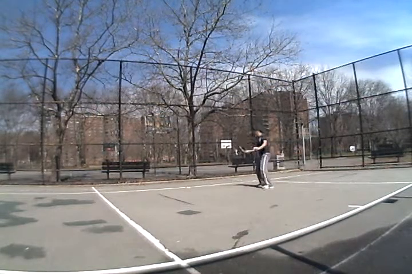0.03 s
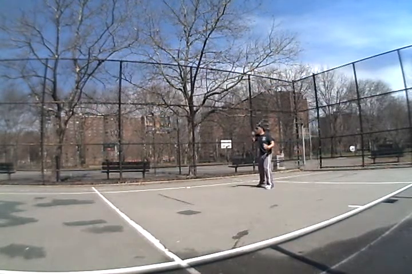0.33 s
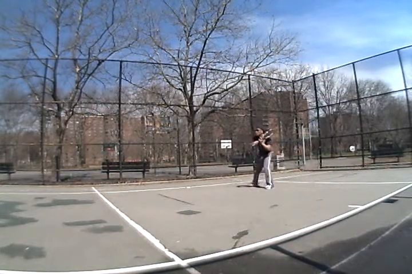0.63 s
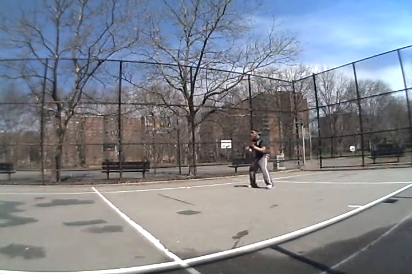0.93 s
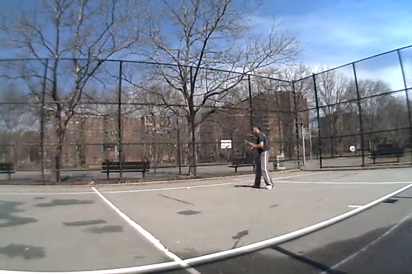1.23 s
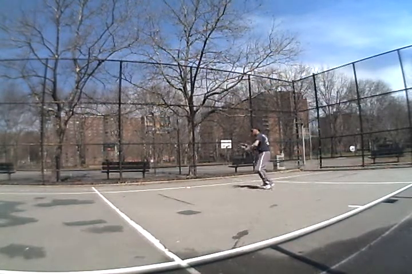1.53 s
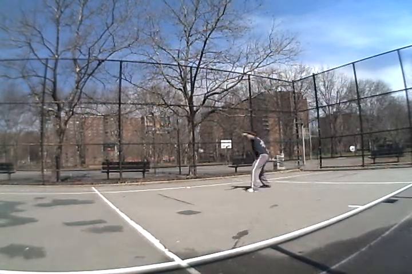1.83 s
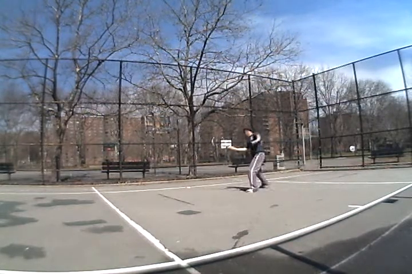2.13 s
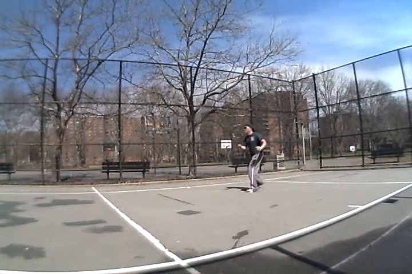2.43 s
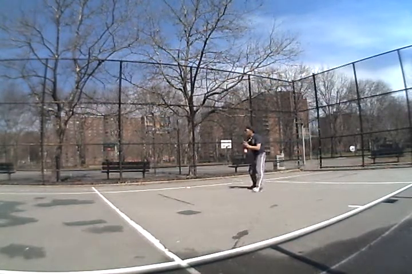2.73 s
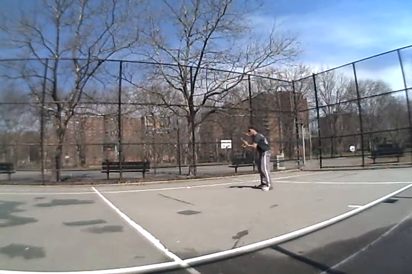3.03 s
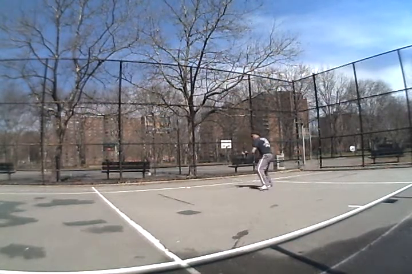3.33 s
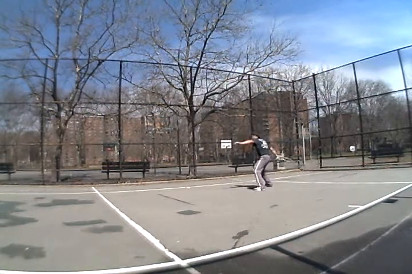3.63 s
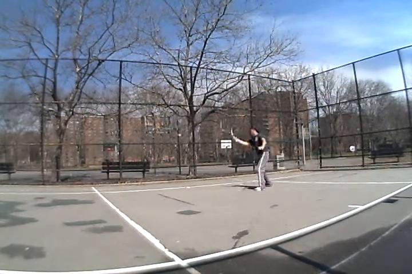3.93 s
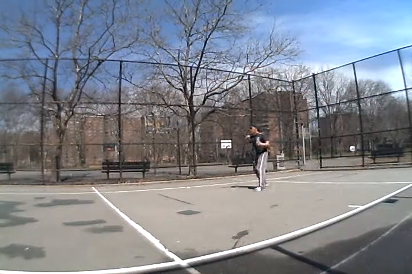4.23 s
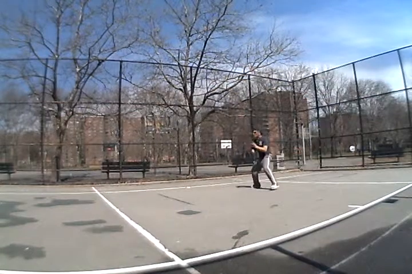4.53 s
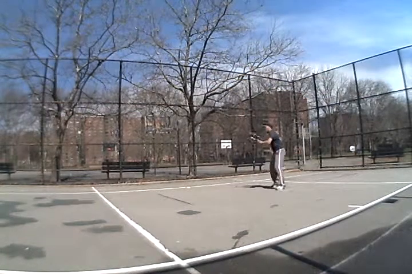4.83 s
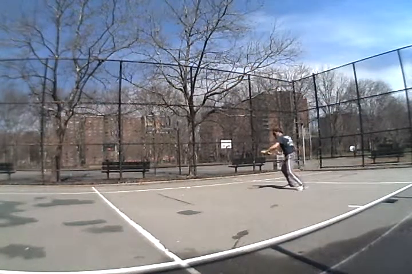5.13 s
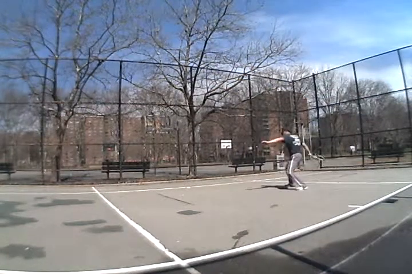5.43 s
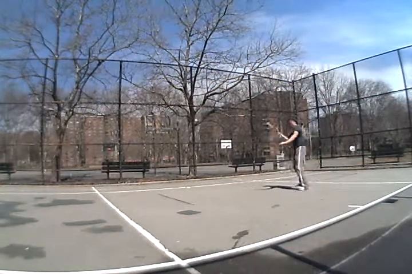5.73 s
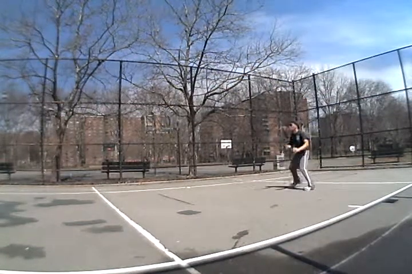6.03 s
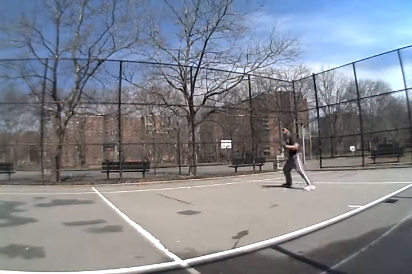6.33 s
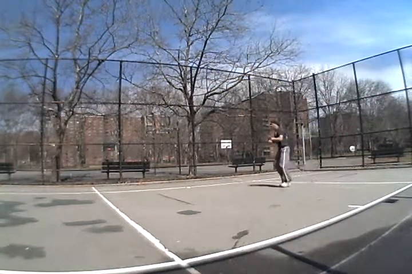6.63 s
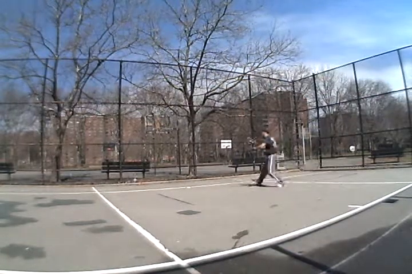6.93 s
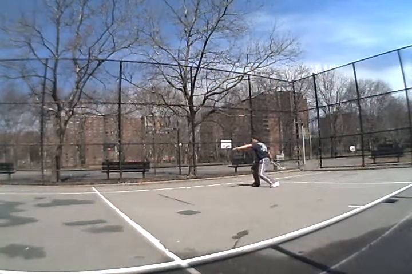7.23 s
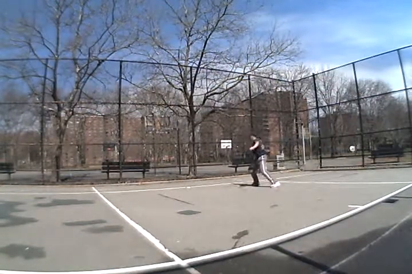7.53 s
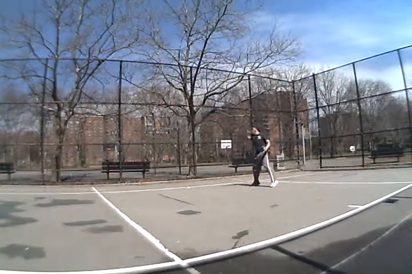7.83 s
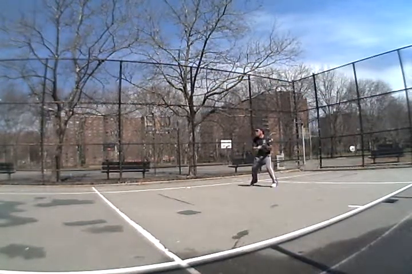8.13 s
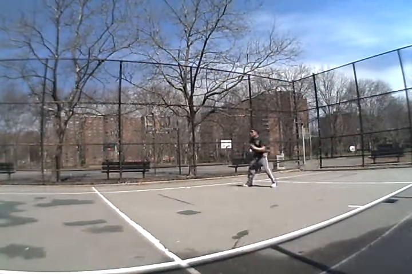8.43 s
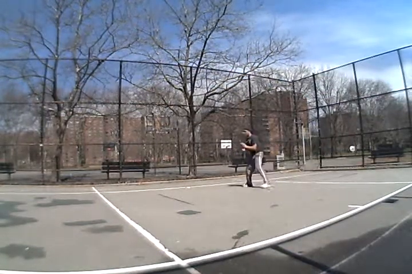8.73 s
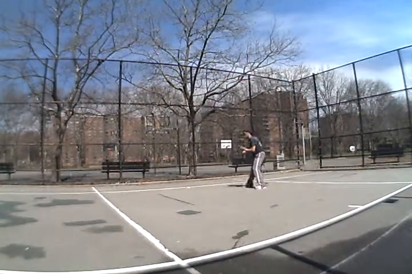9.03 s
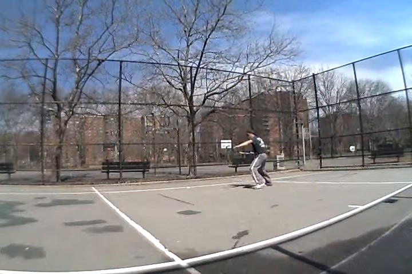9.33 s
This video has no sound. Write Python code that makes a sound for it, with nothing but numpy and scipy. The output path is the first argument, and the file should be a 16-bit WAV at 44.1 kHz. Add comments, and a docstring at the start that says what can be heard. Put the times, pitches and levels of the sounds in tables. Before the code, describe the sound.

Outdoors, over a low breeze and a faint hum of far traffic, a tennis ball goes around in an even cycle: a hollow racket hit, a crisp pop on a wall close to the microphone, then a light bounce on the court. The cycle comes about every two seconds, with quiet gritty shoe scrapes in between. Midway the wind picks up, battering the microphone with loud, fluttering low thumps.

```python
"""Tennis against a practice wall

A player rallies on an outdoor court, heard from near the wall. Each round is a woody racket stroke,
a pop on the wall as the ball's shell buckles, and a softer bounce, with shoes scuffing on grit between.
Gusts buffet the microphone, at times into overload, over the hum of distant traffic."""
import sys
import numpy as np
from scipy import signal
from scipy.fft import rfft, irfft, next_fast_len
from scipy.io import wavfile
from scipy.ndimage import uniform_filter1d, map_coordinates

SR = 44100
rng = np.random.default_rng(int(sys.argv[2]) if len(sys.argv) > 2 else 0)


def to_wav(s):
    """Save 16-bit WAV."""
    ch = np.atleast_2d(s).T  # columns
    pcm = np.round(np.clip(ch, -1, 1) * 32767)  # PCM
    wavfile.write(sys.argv[1], SR, pcm.astype(np.int16))


N = 414099
TIME = np.arange(N) / SR
HIT_TIME = TIME[:SR // 8]
# colour of the court's reverb on strokes and bounces: (frequency [Hz], relative level [dB])
COURT_TAIL = [(100, -3), (300, 4.5), (700, 1), (1400, -2), (2800, -9.5), (4500, -13), (8500, -18.5),
              (12000, -50.5)]


def undb(db):
    """Decibels to gain."""
    return np.exp(np.asarray(db) * np.log(10) / 20)


def unit(x):
    """Scale to rms 1."""
    return x / np.sqrt(np.mean(x ** 2))


def curve(points):
    """An envelope of straight lines through (time [s], value) points."""
    return np.interp(TIME, *np.transpose(points))


def colour(x, points):
    """Equalise by (frequency [Hz], gain [dB]) points."""
    hz, db = np.transpose(points)
    size = next_fast_len(len(x), real=True)
    bins_hz = np.maximum(np.arange(size // 2 + 1) * SR / size, 1)
    gain = undb(np.interp(np.log(bins_hz), np.log(hz), db))
    return irfft(rfft(x, size) * gain, size)[:len(x)]


def noise(points, size=N):
    """Coloured noise of rms 1."""
    return unit(colour(rng.standard_normal(size), points))


def patter(points, per_s, size=N):
    """Random pulses of uneven strength, coloured, rms 1."""
    return unit(colour(rng.standard_normal(size) * (rng.random(size) < per_s / SR), points))


def band(x, hz, q):
    """One resonance."""
    return signal.lfilter(*signal.iirpeak(min(hz, SR / 3), max(q, hz / SR * 3), fs=SR), x)


def band_noise(hz, q, passes=1, size=len(HIT_TIME)):
    """Noise through a resonance; more passes steepen its skirts."""
    x = rng.standard_normal(size)
    for _ in range(passes):
        x = band(x, hz, q)
    return x


def cut(x, hz, kind):
    """Gentle low-pass or high-pass."""
    return signal.lfilter(*signal.butter(1, hz, kind, fs=SR), x)


def walk(per_s):
    """Smooth random wander of rms 1."""
    hold = max(int(SR / per_s), 1)
    steps = np.repeat(rng.standard_normal(N // hold + 1), hold)
    return unit(uniform_filter1d(steps, hold)[:N])


def add(out, s, x):
    """Mix x into out at time s."""
    i = max(int(s * SR), 0)
    out[i:i + len(x)] += x[:max(N - i, 0)]


def kick(at_ms, decay_ms):
    """A sudden pressure step that dies away."""
    ms = HIT_TIME * 1000 - at_ms
    return (ms >= 0) * np.exp(-np.abs(ms) / decay_ms)


def push(at_ms, width_ms):
    """A soft, rounded pressure pulse."""
    return np.exp(-((HIT_TIME * 1000 - at_ms) / width_ms) ** 2)


def ring(modes, at_ms, scatter):
    """Decaying modes, slightly detuned at each blow."""
    t = np.maximum(HIT_TIME - at_ms / 1000, 0)
    out = np.zeros(len(t))
    for hz, db, t60 in modes:
        detuned_hz = hz * (1 + scatter * rng.standard_normal())
        out += undb(db - 60 * t / t60) * np.sin(2 * np.pi * detuned_hz * t)
    return out


def court(x, spectrum, gap_s, early_db, early_t60, late_db, late_t60):
    """After a gap, fence and trees scatter a blow into a wash; house fronts add a faint long one."""
    t = TIME[:SR]
    fade = undb(early_db - 60 * t / early_t60) + undb(late_db - 60 * t / late_t60)
    tail = noise(spectrum, size=SR) * fade * np.clip((t - gap_s) / 0.01, 0, 1)
    return np.pad(x, (0, SR - len(x))) + np.sqrt(np.sum(x ** 2) / SR) * tail


def whine():
    """A faint, narrow high hiss."""
    return undb(-80) * unit(band_noise(hz=7980, q=30, passes=2, size=N))


def thin_tone():
    """A faint thin tone swells and fades far away."""
    swell = np.interp(TIME, [2.25, 2.35, 2.55, 2.65], [0, 1, 1, 0])
    hz = 3380 * (1 + 0.0048 * walk(60))
    return undb(-74.5) * swell * np.sin(2 * np.pi * np.cumsum(hz) / SR)


def traffic():
    """A distant, gently wavering road hum."""
    # rise and fall of the hum: (time [s], relative level [dB])
    ride = [(0, -60.5), (2.9, -59.5), (3.9, -60.5), (5.1, -59), (7.2, -59.5), (7.85, -61.5), (9.39, -62.5)]
    # colour of the road: (frequency [Hz], relative level [dB])
    spectrum = [(40, -1), (120, -4), (250, -6), (500, -10), (800, -13), (1300, -20.5), (2000, -25.5),
                (3300, -33), (4500, -36), (7000, -40.5), (8600, -42.5)]
    return undb(curve(ride) + 11 + .5 * walk(4.2)) * noise(spectrum)


def gusts():
    """The wind's gust envelope: each rises quickly, holds and dies away."""
    # gusts at the microphone: (time [s], hold [s], strength [dB])
    cues = [(0.808, 0.08, -41), (2.7, 0.23, -41.5), (3.297, 0.058, -34.5), (4.132, 0.13, -27.5),
            (4.331, 0.041, -25), (4.494, .23, -23.5), (5.25, 0.47, -24.5), (5.975, 0.043, -27.5),
            (6.344, 0.047, -25), (6.542, 0.15, -26), (6.942, 0.37, -28.5), (7.348, 0.2, -24.5),
            (7.622, 0.51, -39), (8.489, 0.48, -32.5), (9.072, 0.27, -31)]
    attack_s, release_s = 0.052, 0.075
    return sum(undb(db) * np.interp(TIME, [s - attack_s, s, s + hold, s + hold + release_s], [0, 1, 1, 0])
               for s, hold, db in cues)


def buffets():
    """Big eddies peak and collapse, fluttering; returns their pressure and how far they duck the swell."""
    # the hardest buffets: (time [s], peak pressure [full scale], build-up [ms], collapse [ms],
    # relative flutter level [dB], flutter pitch [Hz])
    cues = [(4.356, 0.32, 2.5, 1.8, -35, 453), (4.367, -0.15, 0.94, 1.4, -25.5, 504),
            (4.575, -0.64, 2.4, 2.6, -22.5, 387), (4.672, 0.45, 1.6, 1.2, -13.5, 381),
            (5.6615, -0.99, 4.6, 3.7, -30, 385), (6.358, -0.35, 5.3, 1.3, -14.5, 274),
            (6.626, -0.65, 2.6, 21, -24, 314), (6.647, 0.41, 1.5, 1.5, -20.5, 280),
            (6.689, 0.027, 1.2, 1.1, -23.5, 357), (6.963, -.82, 3.8, 3.6, -31, 396),
            (6.996, 0.2, 1.4, 1, -18, 295), (7.048, 1.1, 3.7, 1.63, -20.5, 439),
            (7.059, -.65, 5, 4, -39, 300), (7.2271, -0.88, 5.4, 2.3, -34, 305),
            (7.355, 0.11, 1.7, 1.5, -28, 446), (7.379, 0.78, 4.6, 1.9, -27, 406),
            (7.499, 1.3, 8, 1.7, -22, 330), (7.53, 0.41, 5, 1.8, -25.5, 536),
            (7.5648, -.95, 6.4, 5, -29, 350), (8.533, 0.19, 1.5, 1.5, -26, 317),
            (8.601, 0.3, 2.7, 1.8, -29, 280), (8.633, 0.31, 4.5, 4.4, -33, 354),
            (8.662, 0.25, 1.6, 1.6, -21.5, 300), (8.69, -0.17, 1.3, 1.9, -24.5, 320),
            (8.793, 0.47, 1.6, 1.4, -29, 320), (9.03, -0.38, 2.5, 2.4, -17.5, 294),
            (9.322, 0.27, 2.1, 1.8, -26, 297)]
    passage_s, core_s = 0.041, 0.021
    out, duck = np.zeros((2, N))
    t = HIT_TIME - HIT_TIME.mean()
    passage, core = (np.cos(np.pi * np.clip(t / span, -.5, .5)) ** 2 for span in (passage_s, core_s))
    for s, pressure, build_ms, collapse_ms, flutter_db, hz in cues:
        peak = 1 / (1 + (1000 * t / np.where(t < 0, build_ms, collapse_ms)) ** 2)
        flutter = unit(band_noise(hz, q=2.3, passes=3))
        add(out, s + t[0], pressure * passage * peak + 0.36 * undb(flutter_db) * core * flutter)
        add(duck, s + t[0], passage)
    return out, np.minimum(duck, 1)


def wind():
    """Slow pressure swells on the microphone; gusts shed eddies, and the strongest break into flutter."""
    # slow pressure of the breeze: (time [s], relative level [dB])
    breeze_ride = [(0.0, -45), (0.05, -30.5), (1.12, -28), (2.59, -36), (4.0, -27), (4.65, -21.5),
                   (5.02, -26), (5.28, -28.5), (5.52, -33.5), (5.75, -12.5), (5.79, -29), (7.22, -16.5),
                   (8.47, -29.5), (8.5, -21), (9.13, -23), (9.39, -28.5)]
    # sub-bass swell, rumbling eddies, flapping vortices: (frequency [Hz], relative level [dB])
    swell_spectrum = [(4, -1), (10, 4), (20, 3.5), (32, -4.5), (50, -5.5), (85, -13.5), (130, -30),
                      (250, -45), (600, -87), (1500, -120)]
    eddy_spectrum = [(50, -9), (100, 1.5), (160, -3), (240, -11), (330, -19), (480, -28), (800, -54.5),
                     (1500, -61), (4000, -100)]
    flutter_spectrum = [(120, -23), (260, 7), (350, 5), (500, -11.5), (750, -23), (1200, -39),
                        (2500, -56.5), (6000, -92)]
    calm_db, break_db, break_width_db = -44.5, -32, 4.5
    breeze, gust = undb(curve(breeze_ride)), gusts()
    pressure = np.hypot(undb(4) * breeze, undb(6) * gust)
    flow_db = 10 * np.log10(gust ** 2 + undb(calm_db) ** 2 + (undb(-16.5) * breeze) ** 2)
    burst = walk(38)  # turbulence comes in packets with lulls between
    swell = pressure * undb(1.34 * walk(14)) * 2.53 * np.tanh(noise(swell_spectrum) / 2)
    breaking = 1 / (1 + np.exp(-(flow_db - break_db) / break_width_db))  # light air stays smooth
    packets = undb(3.5 * burst * (1 + breaking) / 2)
    eddies = undb(flow_db - 0.5) * packets * noise(eddy_spectrum)
    flutter = undb(flow_db - 19.5) * packets ** 2 * breaking * patter(flutter_spectrum, per_s=500)
    shoves, duck = buffets()
    return swell * (1 - duck) + eddies + flutter + shoves


def squeak():
    """Rubber catches on the paint for an instant with a rough chirp."""
    chirp = unit(band_noise(hz=2750, q=3.5, passes=2))
    out = np.zeros(N)
    add(out, s=7.602, x=undb(-58) * push(8, width_ms=6) * chirp)
    return out


def snap(db, hz):
    """One grain of grit cracks."""
    crack = unit(cut(band_noise(hz, q=0.93), 3000, "high"))
    return undb(db - 13) * crack * kick(0, decay_ms=4.5)


def sole(length, hz):
    """Rubber sticks and slips, rasping in two resonances that waver and climb as the slide goes on."""
    # colour of the stick-slip jerks: (frequency [Hz], relative level [dB])
    spectrum = [(100, -21.5), (400, -5), (1000, 14.5), (3800, -3), (5000, -5.5), (8500, -20.5)]
    climb_octaves, waver_octaves = .45, .06
    friction = patter(spectrum, per_s=2400, size=SR)
    body = band(friction, hz, q=5) + .2 * band(friction, hz, q=1) + .9 * band(friction, 1.7 * hz, q=5)
    octaves = climb_octaves * (np.minimum(TIME / length, 1) - .5) + waver_octaves * walk(50)
    playhead = np.cumsum(2 ** octaves[:SR // 2])
    return unit(map_coordinates(body, [playhead], mode="mirror"))


def shoes():
    """Soles drag over grit: a hiss of tiny cracks, a gliding rasp of rubber, and grains that snap."""
    # scuffs: (time [s], length [s], attack [s], hiss level [dB], relative rasp level [dB], pitch [Hz])
    scuffs = [(0.482, .16, .04, -69, -67, 4300), (1.315, 0.051, 0.0059, -61, -43.5, 1360),
              (1.331, 0.11, 0.026, -52, -39, 2060), (1.356, 0.087, .018, -60, -45.5, 3500),
              (1.414, 0.16, 0.022, -53, -54, 3460), (1.881, 0.061, 0.0059, -54, -54, 3980),
              (2.235, 0.11, .022, -55, -74, 4500), (2.772, 0.13, 0.046, -54.5, -45, 2850),
              (2.87, 0.19, 0.038, -52, -49, 3000), (3.186, 0.087, 0.011, -56.5, -67, 3450),
              (3.53, 0.081, 0.015, -51.5, -51.5, 5300), (4.425, 0.074, 0.0043, -57.5, -50, 3300),
              (4.697, 0.1, 0.022, -63, -60, 3460), (4.891, 0.062, 0.0022, -60, -39, 1670),
              (4.891, .014, 0.0018, -58, -41.5, 3000), (4.922, 0.3, 0.023, -55.5, -55, 2950),
              (5.175, 0.046, .008, -60, -56, 3500), (5.76, .14, 0.0086, -58, -49.5, 3100),
              (5.909, 0.17, .01, -63.5, -60, 3240), (6.496, 0.2, 0.021, -54, -63.5, 3740),
              (7.127, 0.1, 0.018, -61, -60, 3500), (7.247, 0.054, 0.0069, -55, -54, 3530),
              (8.048, 0.34, 0.11, -66, -72, 4000), (8.92, 0.074, 0.014, -59, -52, 3000),
              (9.33, 0.094, 0.014, -60, -57.5, 2820)]
    # loud grains under a sole: (time [s], relative level [dB], centre [Hz])
    grit = [(1.889, -25, 7500), (2.264, -32, 7000), (4.6052, -34, 5270), (4.7754, -37, 5430),
            (4.893, -34, 2800), (5.127, -42, 1900), (5.923, -33, 4000), (7.2556, -32, 3500),
            (7.606, -34.5, 5500), (7.714, -37, 5030), (7.9706, -18.5, 8500), (8.062, -41.5, 5500),
            (8.08, -44, 5500), (8.144, -41, 4500), (8.257, -39, 4000), (8.513, -46, 6000),
            (8.56, -43, 4800)]
    # colour of the grit hiss: (frequency [Hz], relative level [dB])
    hiss_spectrum = [(200, -41.5), (800, -26), (2000, -21.5), (3500, 1.5), (5500, -3.5), (7000, -1.5),
                     (8400, -2)]
    release_share, loose_grains_per_s = 0.47, 41
    hiss_level, rasp, snaps = np.zeros((3, N))
    t = TIME[:SR // 2]
    for s, length, attack, hiss_db, rasp_db, hz in scuffs:
        drag = np.clip(np.minimum(t / attack, (length - t) / (release_share * length)), 0, 1)
        add(hiss_level, s, undb(hiss_db) * drag)
        add(rasp, s, undb(rasp_db) * drag * sole(length, hz))
    grains = rng.standard_normal(N) * (rng.random(N) < .08) * undb(2.1 * rng.exponential(size=N))
    hiss = hiss_level * unit(colour(grains, hiss_spectrum))
    slip = undb(2 * walk(220) + walk(45))  # the sole catches and lets go
    for s, db, hz in grit:
        add(snaps, s, snap(db, hz))
    loose = (rng.random(N) < loose_grains_per_s / SR) * hiss_level * rng.random(N)
    snaps += signal.fftconvolve(loose, snap(db=14.5, hz=5100))[:N]
    return slip * (hiss + 0.61 * rasp) + snaps


def ball(buckle_ms, release_ms, ring_db, pitch):
    """The ball slaps a hard face and its shell buckles inward; as it springs back, the air inside rings."""
    # modes of the rubber shell and the air inside: (frequency [Hz], relative level [dB], t60 [s])
    shell_modes = [(1917, -2.5, 0.0072), (2400, -13.5, 0.0078), (4250, -26, 0.021), (5450, -39, 0.0088)]
    air_modes = [(1027, -13.5, 0.012), (1410, -31, 0.026)]
    slap = 1.15 * kick(0, decay_ms=.26)
    flex = -.85 * kick(buckle_ms, decay_ms=1.5) + .75 * push(release_ms, width_ms=.55)
    rubber = ring([(pitch * hz, db, t60) for hz, db, t60 in shell_modes], buckle_ms, scatter=0.036)
    rubber *= 1 - kick(0, decay_ms=8.8)  # the ring fades in
    air = ring([(pitch * hz, db, t60) for hz, db, t60 in air_modes], release_ms, scatter=0.02)
    air *= 1 - kick(release_ms, decay_ms=0.9)
    felt = undb(-21.5) * rng.standard_normal(len(HIT_TIME)) * kick(0, decay_ms=4.5)
    pop = slap + flex + 1.8 * undb(ring_db) * (rubber + air) + felt
    return cut(cut(pop, 3100, "low"), 70, "high")


def bounces():
    """Thin, soft bounces on the court, each repeated by the wall."""
    # ball on the court: (time [s], relative level [dB], wall echo delay [ms])
    cues = [(1.4221, -19, 15), (3.3394, -24.5, 13.8), (5.2322, -19.5, 16.6), (6.999, -20.5, 14),
            (9.107, -22, 13)]
    # tone of a bounce: (frequency [Hz], gain [dB])
    tone = [(200, -2), (700, 0), (1200, 1.5), (2000, 0), (3000, -3), (4200, -2.5), (8000, 2)]
    out = np.zeros(N)
    for s, db, echo_ms in cues:
        pop = undb(db) * band(ball(buckle_ms=1.2, release_ms=3.6, ring_db=-4, pitch=1.08), 1750, q=0.69)
        add(out, s, court(pop, COURT_TAIL, gap_s=.012,
                          early_db=11, early_t60=0.19, late_db=-27, late_t60=.8))
        add(out, s + echo_ms / 1000, undb(-4.5) * pop)
    return colour(out, tone)


def racket(thump_db, ring_db, brush_db, pock_hz, pock_db, partials, cycles):
    """The string bed gives, brushes over the felt and flings the ball off with a short hollow ring."""
    # modes of string bed and frame: (frequency [Hz], relative level [dB], t60 [s])
    string_modes = [(330, -15.5, 0.035), (557, -14, 0.0098), (734, -5, 0.025), (1070, -2.5, 0.019),
                    (1403, -16, 0.056), (1654, -17.5, 0.012), (2470, -14, 0.026)]
    thump = 0.39 * push(0.53, width_ms=0.71) - push(2.46, width_ms=0.73) + 0.31 * push(5.36, width_ms=0.29)
    strings = ring(string_modes, at_ms=0.83, scatter=0.035) * (1 - kick(0, decay_ms=4.1))
    pock_modes = [(ratio * pock_hz, pock_db + db, cycles / pock_hz) for ratio, db in partials]
    pock = sum((-1) ** k * ring([mode], at_ms=0, scatter=0.019) for k, mode in enumerate(pock_modes))
    contact = .7 * push(2.4, width_ms=2.4) + .8 * kick(0, decay_ms=6)
    felt = unit(cut(band_noise(pock_hz, q=1.2), 9600, "low"))
    return undb(thump_db) * thump + undb(ring_db) * strings + pock + 0.38 * undb(brush_db) * contact * felt


def strokes():
    """Each stroke arrives as a woody pock, then again off the wall as a thinner, brighter crack."""
    # racket strokes, levels relative: (time [s], level [dB], string ring [dB], felt brush [dB],
    # pock pitch [Hz], pock [dB], wall echo delay [ms], echo [dB], crack pitch [Hz], crack [dB])
    cues = [(0.1690, -20.5, -7, -10.5, 1700, -7, 18.4, 1.5, 3350, -7),
            (2.1679, -20.5, 3.5, -10.5, 2250, -8, 18.7, 1.5, 4900, -13),
            (3.977, -21.5, -2, -7.5, 1800, -2.5, 18.2, 6.5, 3390, -7),
            (5.7404, -25.5, -0.5, -2.5, 1400, 4.5, 20, 0.5, 2960, 2.5),
            (7.7701, -18, -11.5, -12.5, 1450, -12.5, 17.6, 1, 8000, -9)]
    # hollow ring of the pock, hard ring of its echo: (pitch [ratio], relative level [dB])
    pock = [(.83, -2.5), (1, -1), (1.2, -6.5), (1.42, -8.5), (2.17, -12.5)]
    crack = [(.89, -6), (1, -2.5), (1.15, -4.5), (2.05, -12.5)]
    out = np.zeros(N)
    for s, db, ring_db, brush_db, pock_hz, pock_db, echo_ms, echo_db, crack_hz, crack_db in cues:
        direct = racket(0, ring_db, brush_db, pock_hz, pock_db, pock, cycles=22.6)
        echo = undb(echo_db) * racket(-7.5, ring_db - 5, brush_db - 3, crack_hz, crack_db, crack, cycles=35)
        for at, blow in (s, direct), (s + echo_ms / 1000, echo):
            add(out, at, court(undb(db) * blow, COURT_TAIL, gap_s=0.0084,
                               early_db=14, early_t60=0.15, late_db=-15, late_t60=0.63))
    return out


def wall_hits():
    """Close pops of the ball on the wall, each with a dull slap-back and a light wash of reverb."""
    # ball on the wall: (time [s], relative level [dB], time to buckle [ms], ring [dB], pitch [ratio])
    cues = [(0.7832, -13.5, 1.25, 6.5, 0.91), (2.697, -11.5, 1.32, 7.5, 0.99),
            (4.486, -11, 1.59, 8.5, 0.88), (6.3365, -14, 1.4, 7, 0.9), (8.4373, -19.5, 1.43, 10, 0.98)]
    # tone of the pop and colour of its reverb: (frequency [Hz], relative level [dB])
    tone = [(150, 1), (700, -0.5), (1100, -1.5), (1800, -1), (2400, 1), (3200, -4), (4200, -0.5), (5500, 4),
            (8000, -3.5)]
    tail_spectrum = [(100, -2), (250, 7), (600, -0.5), (1800, -5.5), (2600, -14), (3600, -17.5),
                     (4250, -14), (5200, -24), (8500, -28), (12000, -45)]
    spring_back_ratio, slap_back_s = 2.9, 0.019
    out = np.zeros(N)
    for s, db, buckle_ms, ring_db, pitch in cues:
        pop = undb(db) * ball(buckle_ms, spring_back_ratio * buckle_ms, ring_db, pitch)
        add(out, s, court(pop, tail_spectrum, gap_s=.016,
                          early_db=4, early_t60=0.37, late_db=-24.5, late_t60=0.85))
        add(out, s + slap_back_s, undb(-20) * cut(pop, 2500, "low"))
    return colour(out, tone)


def scene():
    """The rally on the open court, in wind and traffic; mono."""
    ambience = wind() + traffic() + whine() + thin_tone()
    rally = wall_hits() + strokes() + bounces() + shoes() + squeak()
    return (ambience + rally)[None]


def record(dry):
    """The input overloads in the hardest gusts, and the top is cut off."""
    ceiling, top_hz = .7, 8500
    low_pass = signal.ellip(10, .2, 70, top_hz, fs=SR, output="sos")
    return signal.sosfilt(low_pass, np.clip(dry, -ceiling, ceiling))


dry = scene()
out = record(dry)
to_wav(out)
```